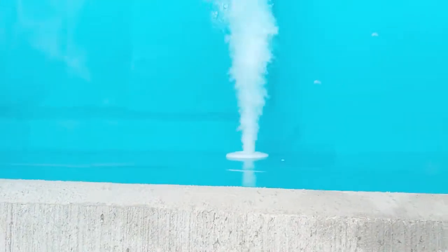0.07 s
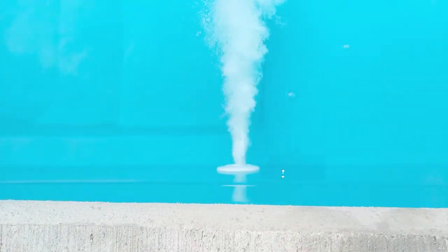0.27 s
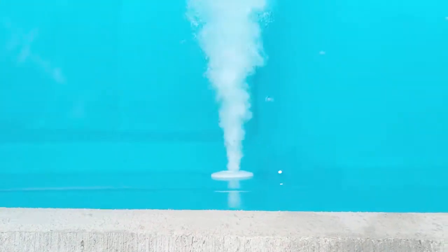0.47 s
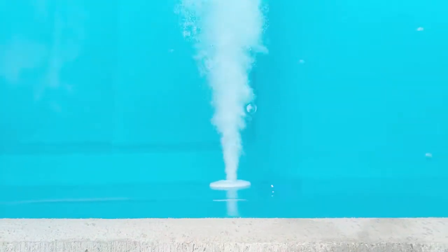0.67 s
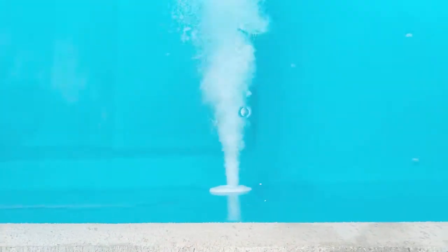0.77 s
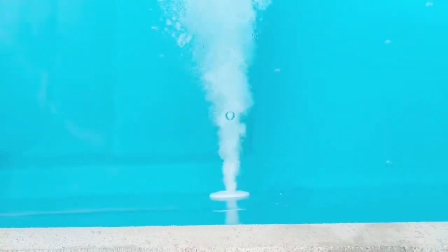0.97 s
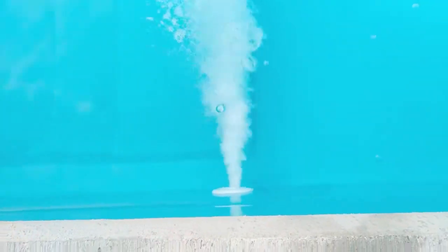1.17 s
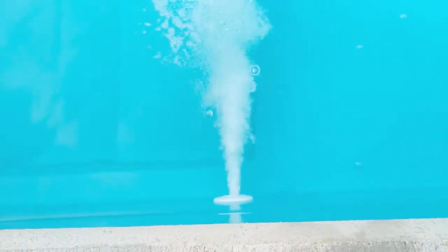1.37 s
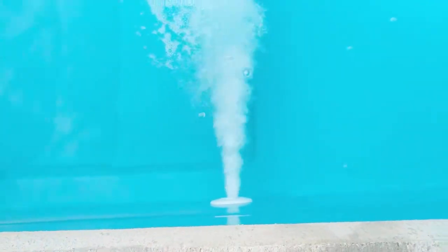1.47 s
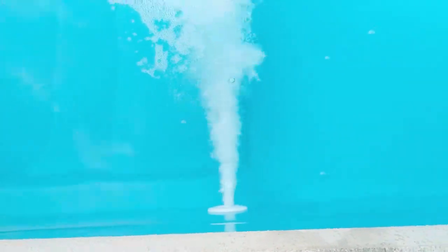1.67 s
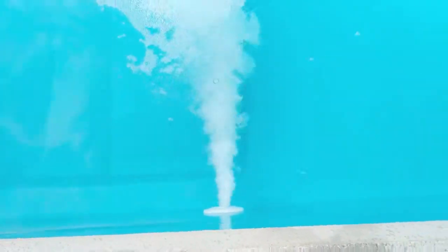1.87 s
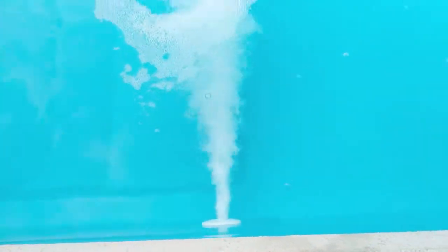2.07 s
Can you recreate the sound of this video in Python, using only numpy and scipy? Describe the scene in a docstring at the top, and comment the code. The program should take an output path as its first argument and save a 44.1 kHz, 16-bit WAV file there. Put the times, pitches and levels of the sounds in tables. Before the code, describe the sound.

Steady hollow bubbling of a water and air jet, with spitting hiss at first, then fine fizz

```python
"""A hollow, steady gurgle and a bright spray hiss, mostly on the left, open a pool jet heard close by.
The jet blows water and air: bubbles pinch off and ring the hollow air pipe, with single big gulps on top.
The gurgle's low notes have nearly opposite polarity left and right. The spray is noise and tiny bursts;
it spits, then falls away after half a second and leaves the fine fizz of small bubbles.
Small bubbles also ring faint higher notes, and a few brief watery notes swell out."""
import sys
import numpy as np
from scipy import signal
from scipy.fft import rfft, irfft, next_fast_len
from scipy.io import wavfile
from scipy.ndimage import uniform_filter1d, map_coordinates

SR = 44100
rng = np.random.default_rng(int(sys.argv[2]) if len(sys.argv) > 2 else 0)


def unload_wav(signal):
    """Save mono or channel-first audio to the path in sys.argv[1] as 16-bit WAV at rate SR, clipped to [-1, 1]."""
    wavfile.write(
        sys.argv[1],
        SR,
        np.round(np.clip(np.atleast_2d(signal).T, -1, 1) * 32767).astype(np.int16),
    )


N = 93536  # length in samples


def amp(db):
    """Turn decibels into a gain factor."""
    return 10 ** (np.asarray(db) / 20)


def unit(x):
    """Scale x to an rms (average strength) of 1."""
    return x / np.sqrt(np.mean(x ** 2) + 1e-20)


def along(points, hz):
    """Read a value at each frequency from (Hz, value) points, on a log frequency axis."""
    point_hz, value = np.transpose(points)
    return np.interp(np.log(hz + 1), np.log(point_hz + 1), value)


def curve(rows):
    """Join (seconds, value) rows with straight lines, one value per sample."""
    return np.interp(np.arange(N) / SR, *np.transpose(rows))


def wobble(rate):
    """A smooth random curve through `rate` random points a second."""
    knots = rng.standard_normal(N // 8)
    return map_coordinates(knots, [np.arange(N) * rate / SR], mode="mirror")


def filtered(x, response):
    """Filter x by a gain (real or complex) that depends on frequency."""
    m = next_fast_len(N + SR // 2)  # spare room, so that the end does not wrap onto the start
    spectrum = rfft(x, m) * response(np.fft.rfftfreq(m, 1 / SR))
    return irfft(spectrum, m)[..., :N]


def panned(pan, hz):
    """Left and right gains at each frequency, with constant total power."""
    gains = amp(along(pan, hz) * np.array([[.5], [-.5]]))
    return gains / np.linalg.norm(gains, axis=0)


def pops(rate, spread_db):
    """Bubbles as random clicks of uneven size and either sign, about `rate` a second; rms 1."""
    happens = rng.random(N) < rate / SR
    size = amp(spread_db * rng.standard_normal(N))
    return unit(happens * rng.choice([-1, 1], N) * size)


def evened(x):
    """x with its slow chance swells partly smoothed out, as the air supply is steady."""
    average_s, share = .06, .55  # averaging time; share of the swells removed, 0 to 1
    power = uniform_filter1d(x ** 2, int(average_s * SR))
    power = abs(uniform_filter1d(power, int(average_s * SR / 2)))
    return x * (power / power.mean() + 1e-6) ** (-share / 2)


def resonances(drive, modes, waver_db, order):
    """A bank of resonances that ring when driven, each swelling and sinking on its own."""
    t = (np.arange(N) - N / 2) / SR  # seconds from the middle
    out = np.zeros(drive.shape)
    for k, (hz, width, db, drift) in enumerate(modes):
        ring = filtered(drive, lambda f: (1j * f * width / (hz * hz - f * f + 1j * f * width)) ** order)
        level = amp(db + drift * t + waver_db * wobble(17.74))
        out += (-1) ** k * evened(ring) * level  # neighbours have opposite signs
    return out


def hollows(table, f):
    """Gain of a set of smooth dips in the spectrum; a negative depth is a slight bump."""
    return amp(-sum(db * np.exp(-((f - hz) / width) ** 2) for hz, width, db in table))


def swells(rows, width_hz):
    """Narrow bands of noise, heard as wavering notes that rise and sink smoothly."""
    out = np.zeros(N)
    for middle, length, hz, db in rows:
        note = filtered(rng.standard_normal(N), lambda f: np.exp(-((f - hz) / width_hz) ** 2))
        u = np.clip((np.arange(N) / SR - middle) / length, -.5, .5)
        out += amp(db) * np.cos(np.pi * u) * evened(unit(note))
    return out


def patchy(x, depth_db):
    """x with passing patches of gain, some hundred Hz wide and some tens of ms long."""
    z = signal.stft(x, nperseg=512)[2]
    field = uniform_filter1d(rng.standard_normal(z.shape[1:]), size=4, axis=0)  # across frequency
    field = uniform_filter1d(field, size=9, axis=1)  # across time
    return signal.istft(z * amp(depth_db * unit(field)), nperseg=512)[1][:, :N]


def pipe_ring(drive):
    """The hollow air pipe rings at its resonances, within the band that it passes; rms 1."""
    # The pipe's resonances. Each row: pitch in Hz, width in Hz, level in dB halfway through,
    # drift of the level in dB per second.
    pipe_notes = [(86, 44, -5.5, -1.5), (242.3, 31.7, -4.5, 3.5), (444.2, 45.3, 0, 0), (516.5, 42, 0.5, -1),
                  (573.4, 57, 1, -0.5), (733, 58.6, 0, -0.5), (898, 80, -2.5, -2), (1123, 37, 1, -4),
                  (1302.6, 33, 0, -1), (1354, 47, -6.5, -1), (1482.5, 47, -2, 0.5), (1682, 27, -10.5, 5.5)]
    # Weak spots between the resonances. Each row: centre in Hz, width in Hz, depth in dB.
    pipe_hollows = [(177, 16, -1), (367, 41, 4), (1011, 49, 1), (1158, 40, 3.5), (1635, 28, 6.5)]
    top_hz, bottom_hz = 1650, 49.5  # edges of the band

    def body(f):
        upper_edge = 1 + (f / top_hz) ** 90
        lower_edge = 1 + (bottom_hz / (f + 1)) ** 4
        return hollows(pipe_hollows, f) / np.sqrt(upper_edge * lower_edge)

    return unit(filtered(resonances(drive, pipe_notes, waver_db=.3, order=1), body))


def big_gulps():
    """Single large bubbles, each a short note that swells and dies; low ones last longer."""
    # Big gulps of air. Each row: start in seconds, pitch in Hz, peak in dB against the pipe ring's rms.
    gulp_rows = [(0.018, 91.6, 1), (0.05, 1110, 6.5), (0.101, 83, 4), (0.41, 90, -1.5), (0.277, 550, -4),
                 (0.566, 740, 0), (0.66, 590, -0.5), (0.671, 98, -2), (0.678, 1504, 4), (0.76, 760, 4.5),
                 (0.763, 514, 3), (0.842, 570, 7.5), (0.934, 568, 5), (0.951, 91, -0.5), (0.963, 563, 6),
                 (1.005, 1314, -1), (1.041, 153, -3), (1.072, 590, 4), (1.092, 1286, 3.5),
                 (1.096, 1536, 2.5), (1.092, 91, 0.5), (1.161, 570, 1), (1.164, 1107, 4), (1.192, 760, -7),
                 (1.289, 559, 5), (1.398, 600, 4.5), (1.365, 124, -3), (1.628, 526, 6), (1.63, 1295, 1.5),
                 (1.725, 768, 1), (1.781, 625, 2.5), (1.828, 574, 6), (2.024, 576, 1.5), (2.03, 229, -2),
                 (2.072, 607, 4)]
    out = np.zeros(N)
    for start, hz, db in gulp_rows:
        t = np.maximum(np.arange(N) / SR - start, 0)
        u = t / (.005 + .9 / hz)  # the rise takes 5 ms plus 0.9 of a cycle
        swell = (u * np.exp(1 - u)) ** 2
        out += amp(db) * swell * np.sin(2 * np.pi * (hz * t + rng.random()))
    return out


def gurgle():
    """Bubbles and turbulence drive the pipe; a little of the sound arrives diffusely."""
    # Loudness of the gurgle over time. Each row: time in seconds, level in dB before the trim.
    gurgle_level, trim_db = [(0.0, -39), (0.05, -37.5), (0.61, -38), (0.7, -35.5), (0.73, -37.5),
                             (1.09, -35.5), (1.1, -36.5), (1.14, -34.5), (1.29, -35.5), (2.12, -36)], 7.5
    # The pipe sings on one resonance. Each row: middle in seconds, length in seconds, pitch in Hz,
    # level at the middle in dB against the pipe ring's rms.
    pipe_swells = [(0.33, 0.26, 1304, -11), (1.34, 0.24, 1501, -5.5), (1.74, 0.13, 1680, -11.5),
                   (1.82, 0.07, 1687, -14), (2.04, 0.36, 1696, -20.5)]
    # How far the left side leads. Each row: frequency in Hz, lead in radians.
    gurgle_lead = [(60, 3.09), (300, 3.32), (1000, 3.55), (1120, 3.85), (1260, 4.45), (1450, 4.5),
                   (1700, 4.5)]
    # Balance between the sides. Each row: frequency in Hz, left minus right in dB.
    gurgle_pan = [(60, 2.8), (250, 4.85), (550, 4.47), (900, 2.9), (1100, .2), (1700, 0.8)]
    # How alike the sides are. Each row: frequency in Hz, likeness from 0 to 1.
    gurgle_alike = [(100, 0.93), (700, 0.95), (1400, 0.95), (1750, 0.1)]

    churn = amp(0.5) * rng.standard_normal(N)  # turbulence under the bubbles
    direct = pipe_ring(pops(400, spread_db=3.0) + churn)
    direct = direct + big_gulps() + swells(pipe_swells, width_hz=39)
    diffuse = pipe_ring(rng.standard_normal(N))
    sides = np.array([[1], [-1]])

    def turn(hz):  # mixing angle: 0 makes both sides the same
        return np.arccos(np.clip(along(gurgle_alike, hz), 0, 1)) / 2

    def placing(hz):
        return panned(gurgle_pan, hz) * np.exp(.5j * sides * along(gurgle_lead, hz))

    shared = filtered(direct, lambda hz: np.cos(turn(hz)))
    pair = shared + sides * filtered(diffuse, lambda hz: np.sin(turn(hz)))
    return unit(filtered(pair, placing)) * amp(curve(gurgle_level) + trim_db)


def spits():
    """Sudden spits in the hiss: each is a quick change of level in dB that then fades back."""
    # Spits of air. Each row: start in seconds, greatest rise in dB (negative is a dip).
    spit_rows = [(0.056, 2), (0.141, 0), (0.177, 2), (0.268, 3), (0.351, 1), (0.368, 2.5), (0.414, 1),
                 (0.448, -2), (0.512, 1.5), (0.526, -1), (0.678, 4), (0.839, 2), (1.106, 5), (1.162, 5.5),
                 (1.804, 4.5), (1.829, 5)]
    out = np.zeros(N)
    for start, db in spit_rows:
        u = np.maximum(np.arange(N) / SR - start, 0) / 0.0017  # rise time in seconds
        out += db * u * np.exp(1 - u)
    return out


def hiss(colour, pan, pops_per_s, pop_db, spread_db, flutter_db, flutter_rate, patchy_db):
    """Tiny bursts and noise, drawn apart for left and right, with shared patches and flutter; rms 1."""
    bursts = np.array([pops(pops_per_s, spread_db) for side in range(2)])
    pair = rng.standard_normal((2, N)) + amp(pop_db) * bursts
    pair = patchy(pair, patchy_db)
    pair = filtered(pair, lambda hz: amp(along(colour, hz)) * panned(pan, hz))
    return unit(pair * amp(flutter_db * wobble(flutter_rate)))


def spray():
    """The broad hiss of air and water, strong at first."""
    # Loudness of the spray. Each row: time in seconds, level in dB before trim and spits.
    spray_level, trim_db = [(0.0, -35), (0.02, -32), (0.04, -35.5), (0.13, -40), (0.18, -36.5), (0.22, -42),
                            (0.28, -39), (0.32, -41), (0.37, -37.5), (0.39, -44), (0.42, -38.5),
                            (0.46, -42), (0.52, -36), (0.56, -43), (0.68, -49.5), (0.76, -56), (0.93, -60),
                            (1.0, -55.5), (1.05, -59), (1.16, -55.5), (1.4, -65.5), (1.7, -68.5),
                            (1.85, -62.5), (2.12, -62.5)], 5.5
    # Tone of the spray. Each row: frequency in Hz, relative level in dB.
    spray_colour = [(1000, -13.5), (1850, -10.5), (2300, -11), (3000, -4.5), (3700, -8.5), (4300, -1.5),
                    (4800, -8), (5600, -2), (6500, -7.5), (7300, -4), (8500, -6), (10600, 1), (12000, -6),
                    (13300, -3.5), (15500, -31)]
    # Balance between the sides. Each row: frequency in Hz, left minus right in dB.
    spray_pan = [(1800, 1.5), (2400, 18), (3050, 2.3), (3400, 7.1), (4300, 8.1), (4900, 3.1), (7300, 4.5),
                 (8700, 34), (11000, 22), (15000, 26)]
    sound = hiss(spray_colour, spray_pan, pops_per_s=2300, pop_db=-5.0, spread_db=2.5,
                 flutter_db=0.8, flutter_rate=90, patchy_db=2.2)
    return amp(curve(spray_level) + spits() + trim_db) * sound


def fizz():
    """The fine high fizz of small bubbles: the same kind of hiss with denser, fainter bursts."""
    # Loudness of the fizz. Each row: time in seconds, level in dB before the spits.
    fizz_level = [(0.0, -35), (0.02, -26.5), (0.03, -33), (0.13, -39), (0.18, -35), (0.22, -42),
                  (0.26, -38), (0.45, -36.5), (0.51, -35.5), (0.6, -46.5), (0.88, -45), (1.08, -44),
                  (1.17, -39.5), (1.24, -42.5), (1.74, -42.5), (1.85, -41), (1.95, -43), (2.12, -42)]
    # Tone of the fizz. Each row: frequency in Hz, relative level in dB.
    fizz_colour = [(3000, -63), (4900, -24), (6500, -15), (8500, -8), (10000, -2.5), (11200, 1),
                   (12200, -5.5), (14000, -8), (15600, -16)]
    # Balance between the sides. Each row: frequency in Hz, left minus right in dB.
    fizz_pan = [(5000, 1.3), (7300, 10), (9000, 23.5), (11000, 25), (13000, 16.5), (15000, 32)]
    sound = hiss(fizz_colour, fizz_pan, pops_per_s=3800, pop_db=-12.5, spread_db=4.5,
                 flutter_db=1.0, flutter_rate=190, patchy_db=0.7)
    return amp(curve(fizz_level) + spits()) * sound


def burble():
    """Small bubbles ring faint higher notes that come and go above the gurgle; a few swell out."""
    # Weak upper resonances. Each row: pitch in Hz, width in Hz of one of two equal stages,
    # level in dB halfway through, drift of the level in dB per second.
    burble_notes = [(2134, 184, -1, -5.5), (2482, 250, -4.5, 8), (2662, 60, 3, 3), (2866, 77, 1, -3),
                    (3430, 85, 4, -2), (3856, 140, -5.5, -11.5), (4160, 350, -2, -2.5), (5690, 300, -3, 9)]
    # Loudness of the burble. Each row: time in seconds, level in dB before the trim.
    burble_level, trim_db = [(0.0, -44), (0.11, -56), (0.5, -46), (0.62, -52), (0.88, -56), (1.0, -52),
                             (1.2, -51.5), (1.42, -63), (1.55, -59), (1.71, -64), (1.98, -63.5),
                             (2.12, -65.5)], 2.5
    # Brief watery notes. Each row: middle in seconds, length in seconds, pitch in Hz,
    # level at the middle in dB before panning.
    watery_notes = [(0.97, 0.053, 3400, -60), (0.98, 0.082, 2030, -55), (1.02, 0.067, 4300, -59),
                    (1.165, 0.029, 4420, -51), (1.22, 0.15, 2730, -60), (1.32, 0.18, 3450, -61.5),
                    (1.475, 0.11, 2530, -56), (1.99, 0.17, 2510, -61.5)]
    # Balance between the sides. Each row: frequency in Hz, left minus right in dB.
    burble_pan = [(2100, 12.4), (2550, 3.1), (2900, 2.6), (3440, 17), (4200, 4.9), (5600, 5.5)]

    bubbles = np.array([pops(500, spread_db=1.5) for side in range(2)])
    churn = amp(-3.5) * rng.standard_normal((2, N))  # turbulence under the bubbles
    notes = resonances(bubbles + churn, burble_notes, waver_db=1.2, order=2)
    bed = amp(curve(burble_level) + trim_db) * unit(patchy(notes, depth_db=3.5))
    swelling = np.array([swells(watery_notes, width_hz=110) for side in range(2)])
    return np.sqrt(2) * filtered(bed + swelling, lambda hz: panned(burble_pan, hz))


def scene():
    """The gurgle with spray, fizz and burble over it."""
    # Weak spots in all but the gurgle. Each row: centre in Hz, width in Hz, depth in dB.
    hiss_hollows = [(1940, 44, 4.5), (2920, 60, 0.5), (3630, 89, 0.5), (4870, 310, -1), (6600, 270, 0)]
    upper = spray() + fizz() + burble()
    return gurgle() + filtered(upper, lambda hz: hollows(hiss_hollows, hz))


def record(dry):
    """The recorder keeps nothing above its band limit."""
    return filtered(dry, lambda hz: hz < 15780)


dry = scene()
out = record(dry)
unload_wav(out)
```